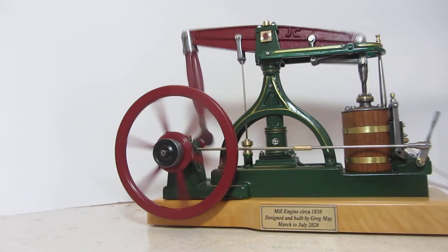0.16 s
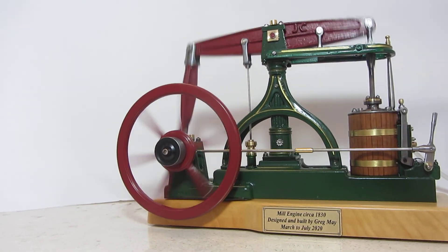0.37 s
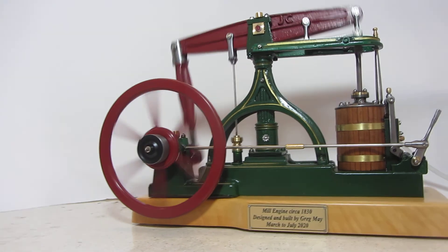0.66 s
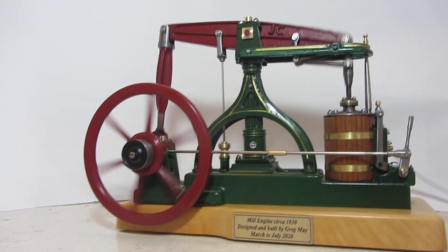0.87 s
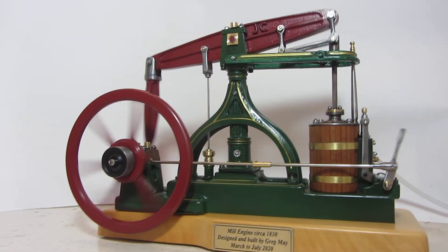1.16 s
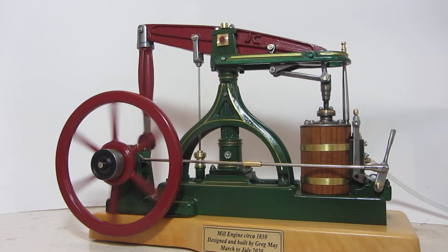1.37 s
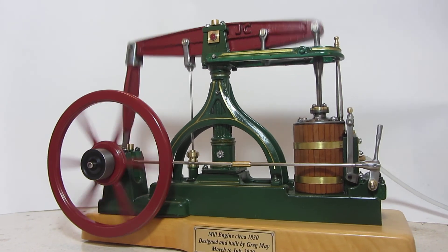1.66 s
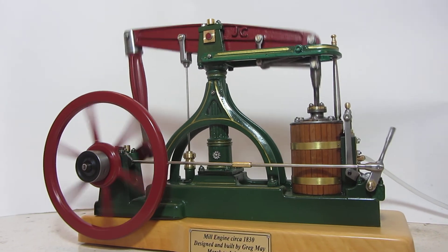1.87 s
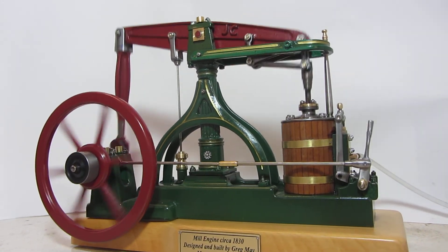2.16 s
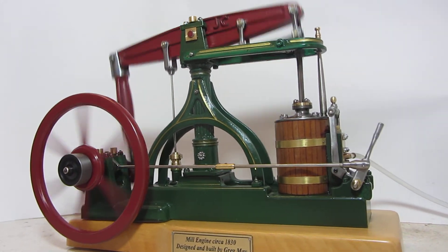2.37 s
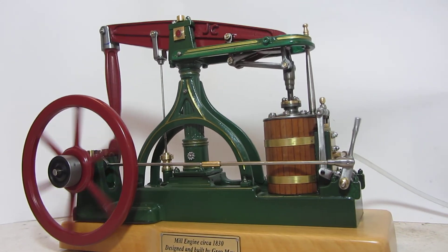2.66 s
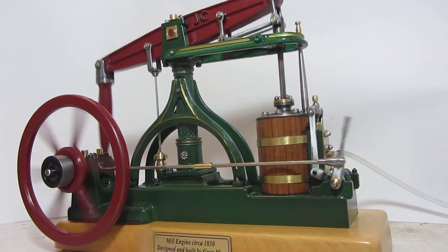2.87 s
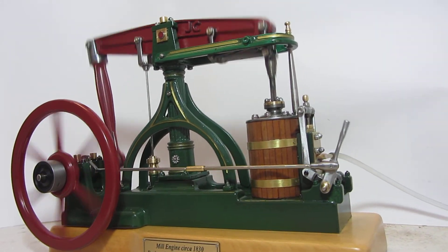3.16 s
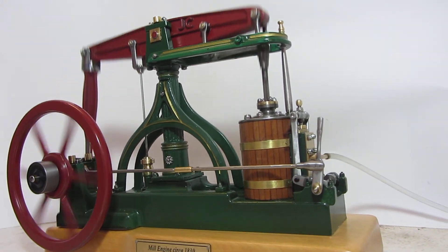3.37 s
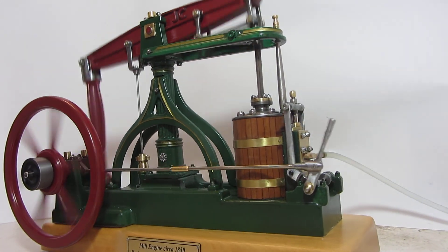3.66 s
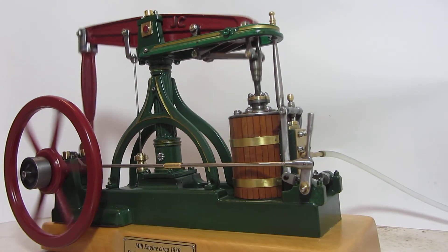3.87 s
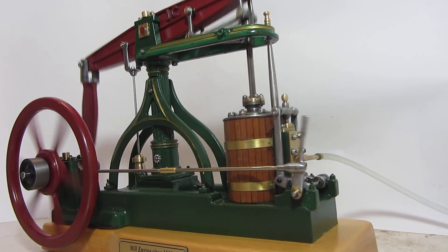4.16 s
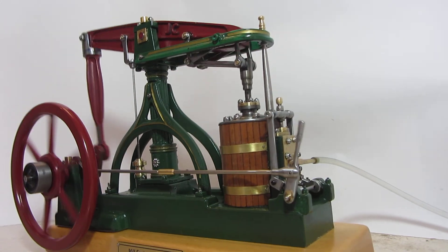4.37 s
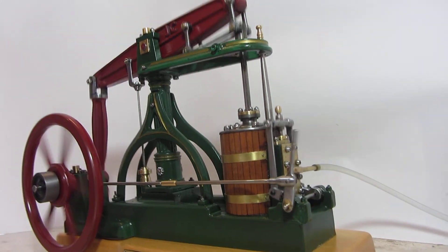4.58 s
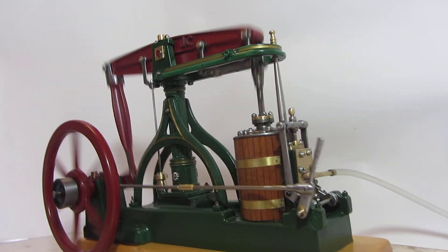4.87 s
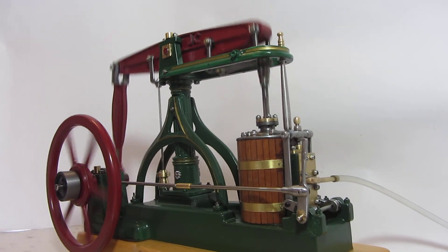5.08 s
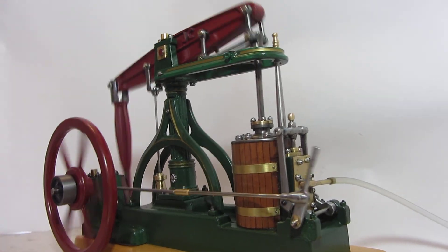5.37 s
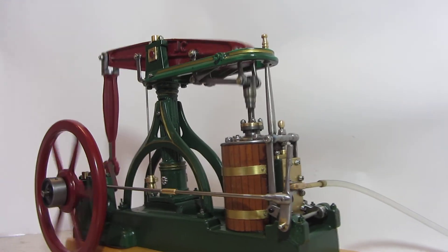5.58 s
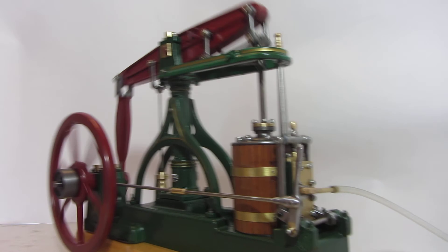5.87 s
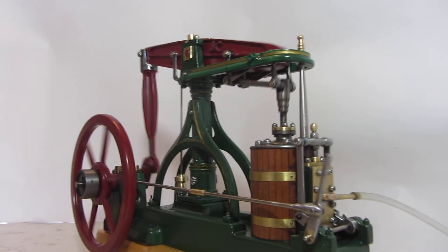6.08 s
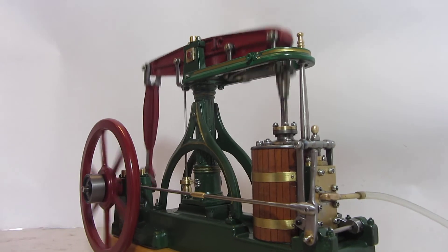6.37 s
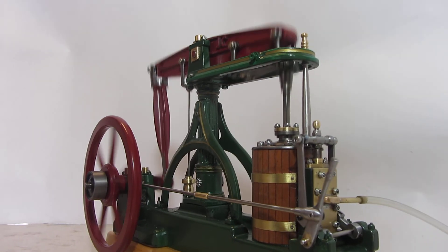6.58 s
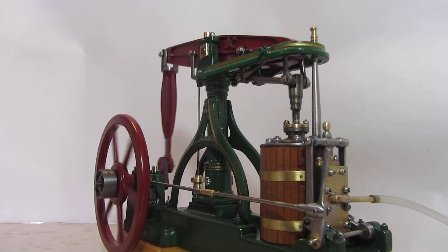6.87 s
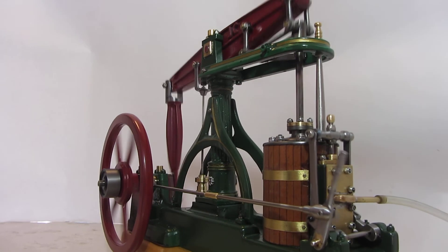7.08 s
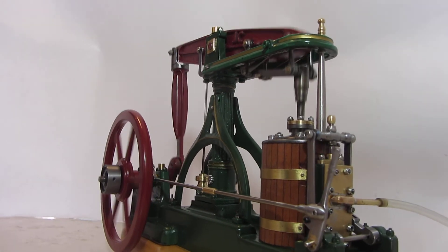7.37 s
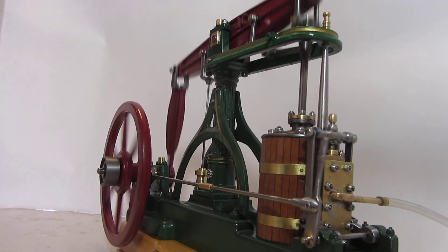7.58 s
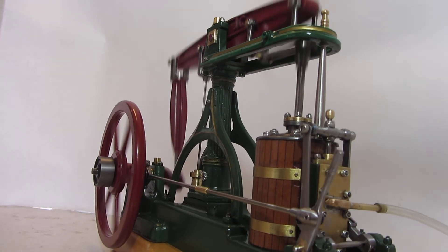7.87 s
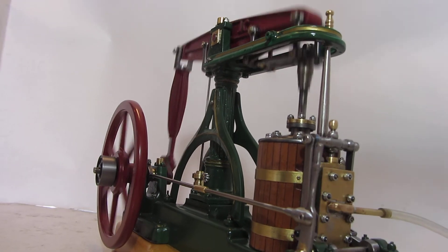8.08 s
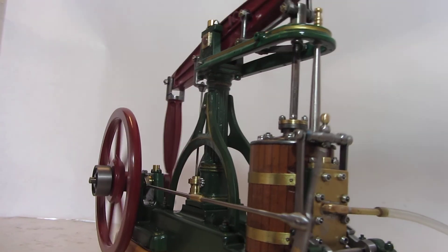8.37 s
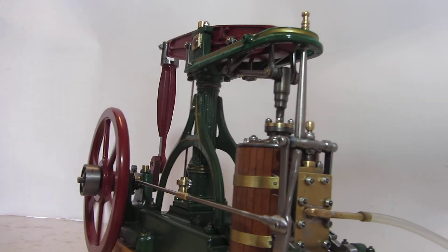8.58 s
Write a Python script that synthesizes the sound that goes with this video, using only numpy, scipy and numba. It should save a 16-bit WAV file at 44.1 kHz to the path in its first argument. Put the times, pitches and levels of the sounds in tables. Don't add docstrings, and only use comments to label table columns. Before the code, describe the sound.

A small tabletop beam engine on compressed air chuffs in fast, even pairs of breathy hisses, with metal joints knocking over a faint room hum.

```python
import sys
import numpy as np
from scipy import signal
from scipy.fft import rfft, irfft
from scipy.io import wavfile
from scipy.ndimage import uniform_filter1d
from numba import njit

SR = 44100
rng = np.random.default_rng(int(sys.argv[2]) if len(sys.argv) > 2 else 0)


def to_wav(sig):
    pcm = np.clip(np.atleast_2d(sig), -1, 1) * 32767
    pcm = np.round(pcm).astype(np.int16)
    wavfile.write(sys.argv[1], SR, pcm.T)


def level_to_linear(level):
    exponent = np.asarray(level, float) / 20
    return 10 ** exponent


N = 385434
T = np.arange(N) / SR
FREQ = np.fft.rfftfreq(N, 1 / SR) + 1e-9

# [crank knock t/s, crank knock level/dB, valve rod tap level/dB, beam link tap level/dB]
TURNS = [(0.155, -20, -46, -20), (0.583, -24, -43, -19), (1.01, -20, -30, -22.5), (1.436, -20, -33, -38),
         (1.862, -19.5, -30, -20.5), (2.288, -20.5, -41, -25), (2.715, -20, -46, -31),
         (3.141, -17.5, -38, -22), (3.566, -13.5, -28, -23), (3.994, -16, -19, -23),
         (4.421, -20.5, -47, -19), (4.845, -19, -23, -23), (5.27, -18, -32, -22.5), (5.694, -17, -36, -21),
         (6.119, -17, -44, -21), (6.546, -13.5, -25, -16), (6.972, -13, -22, -18), (7.398, -13, -21, -19),
         (7.821, -13, -25, -19), (8.243, -14, -37, -22), (8.666, -13, -23, -22)]
# [share of the turn, jet level/dB, pipe level/dB]
UP_STROKE = [
    (0, -20, -9),
    (.03, -3.5, -11),
    (.08, 6.5, -1),
    (.14, 3, 3.5),
    (.3, 2.5, 1.5),
    (.35, 2, -3),
    (.4, -8.5, -6),
    (.46, -12, -26),
    (.52, -38, -40),
]
# [share of the turn, jet level/dB, pipe level/dB]
DOWN_STROKE = [
    (.44, -34, -25),
    (0.482, -0.5, -6),
    (.54, 5.5, 0),
    (.68, 2.5, 1),
    (.78, -2.5, -3.5),
    (.86, -6, -8),
    (.94, -23, -19),
    (.995, -51, -25.5),
]
PIPE_BEND = [(0, 0.41), (.08, 0.88), (.2, 0.99), (.33, 0.966), (.43, 0.69), (.5, 1.24), (.95, 0.7)]
# [f/Hz, level/dB per Hz]
JET_SPECTRUM = [(700, -34.5), (1400, -20), (2080, -6), (2400, -30), (3160, -6), (3600, -8), (4250, 0),
                (5030, -4), (6100, -0.3), (8250, 1), (12200, -15), (14700, -12), (15650, -13.5),
                (16100, -47)]
# [f/Hz, width/Hz, level/dB]
PIPE_MODES = [(2124, 430, 2), (3060, 1160, 0.5), (4480, 1640, 4)]
# [t/s, jet level/dB, pipe level/dB]
PORT = [(0.15, -32, -33.5), (1, -30.5, -32.5), (2.7, -30.5, -32.5), (4.4, -28.5, -30), (5.3, -28.5, -30.5),
        (6.1, -28.5, -30.5), (7.4, -27, -32.5), (8.7, -27, -30.5)]
# from the side, half way, at the valve end [level/dB]
RUSH_DB = (-18, -21.5, -22.5)
# from the side, at the valve end [level/dB]
LEAK_DB = (-42.5, -40.5)
MOUTH_RATIO = (1.18, 1.16, 1.0)
# [t/s, level/dB]
STRAY_TAPS = [
    (0.261, -19),
    (7.008, -21),
]
# [f/Hz, level/dB, t60/s]
FRAME_MODES = [(297, -6.5, 0.044), (432, -1, 0.033), (534, -9, 0.061), (902, -4.5, 0.019),
               (1120, -7, 0.028), (1450, -3, .015)]
# [f/Hz, level/dB, t60/s]
BASE_MODES = [(74, -16, .3), (97, -12, .4), (151.9, 0, .43), (169.5, -6, .7)]
THUMP_DB = (-38.5, -34.5, -30.5, -27.5)
# [t/s, left lag/ms, left minus right level/dB, lift of the top level/dB]
CAMERA_PATH = [(0, 0.073, -8, -5), (1, 0.08, -7, -8), (2.098, 0.072, -9, -3), (2.9, 0.051, -10, -1),
               (3.9, 0.045, -9.5, -0.5), (4.5, 0.035, -7.5, 2), (6.3, 0.041, -6.5, 0),
               (8.74, 0.032, -8, 1.5)]
# [t/s, share of the way]
CAMERA_WAY = [(0.0, 0.0), (1.0, 0.06), (2.1, 0.18), (2.9, 0.26), (3.9, 0.47), (4.5, 0.6), (6.3, 0.86),
              (8.74, 1.0)]
# [delay from the side/ms, delay at the valve end/ms, share from the side, share half way, share at the end]
ECHO_LEFT = [(0.206, 0.233, -0.31, -0.48, -0.02), (0.388, 0.296, 0.0, 0.12, -0.14),
             (0.244, 0.319, -0.12, -0.38, 0.1), (0.318, 0.371, -0.14, 0.01, 0.27),
             (0.501, 0.427, -0.1, -0.33, 0.18), (0.649, 0.61, -0.05, -0.18, -0.34),
             (0.757, 0.662, 0.13, 0.04, 0.11), (0.882, 0.816, 0.19, 0.19, 0.23),
             (1.456, 1.117, 0.04, 0.05, 0.07)]
# [delay from the side/ms, delay at the valve end/ms, share from the side, share half way, share at the end]
ECHO_RIGHT = [(0.245, 0.221, -0.49, -0.23, -0.15), (0.366, 0.346, -0.06, 0.27, 0.27),
              (0.435, 0.413, -0.04, 0.2, 0.27), (0.772, 0.577, 0.24, 0.29, 0.17),
              (0.828, 0.678, -0.03, 0.21, 0.02), (0.886, 0.748, 0.2, 0.29, 0.23),
              (1.201, 0.939, 0.07, 0.04, 0.08), (1.601, 1.149, 0.19, -0.02, -0.09),
              (1.717, 1.384, 0.12, 0.04, 0.09)]
# [f/Hz, level/dB per Hz]
ROOM_SPECTRUM = [(15, -47), (25, -5), (153, 2), (363, -2), (451, -5), (503, -3), (754, -5.5), (2000, -2.5),
                 (3080, 3.5), (3720, 3), (6920, -36), (9070, 28), (12500, 10), (14800, -13), (16000, -27)]
# [t/s, level/dB]
FAN_HUM = [(0, -54.5), (2, -50), (4, -53), (6, -55), (8.74, -53.5)]


def exhaust(top_db, way):
    knock_s = np.transpose(TURNS)[0]
    marks = np.r_[2 * knock_s[0] - knock_s[1], knock_s, 2 * knock_s[-1] - knock_s[-2]]
    phase = np.interp(T, marks, np.arange(len(marks))) % 1
    port_s, *port_levels = np.transpose(PORT)
    jet_db, pipe_db = (np.interp(T, port_s, level) for level in port_levels)
    up_jet, up_pipe = valve(UP_STROKE, phase)
    down_jet, down_pipe = valve(DOWN_STROKE, phase)
    jet_flow = level_to_linear(jet_db) * (up_jet + down_jet * level_to_linear(between((2, 2, 1.5), way)))
    pipe_flow = level_to_linear(pipe_db) * (up_pipe + down_pipe * level_to_linear(between((-4.5, -7, -6), way)))
    hiss = jet(top_db)
    tone = pipe(phase, way)
    rush = level_to_linear(between(RUSH_DB, way)) * noise(peak(1660, 450) ** 2)
    leak = level_to_linear(between(LEAK_DB, way)) * noise(colour(JET_SPECTRUM) * np.sqrt(FREQ / 6000))
    jet_flow = jet_flow * level_to_linear(0.85 * walk(90))
    pipe_flow = pipe_flow * level_to_linear(1.73 * walk(60))
    return jet_flow * (hiss + rush) + pipe_flow * tone + leak


def valve(opening, phase):
    share, *levels = np.transpose(opening)
    return [level_to_linear(np.interp(phase, share, level, -80, -80)) for level in levels]


def jet(top_db):
    low_share = 1 / np.sqrt(1 + (FREQ / 10500) ** 8)
    white = rfft(rng.standard_normal(N)) * colour(JET_SPECTRUM)
    return unit(irfft(white * low_share, N) + level_to_linear(top_db) * irfft(white * (1 - low_share), N))


def pipe(phase, way):
    bend = np.interp(phase, *np.transpose(PIPE_BEND))
    breaths = rng.standard_normal((len(PIPE_MODES), N))
    ratios = (between(MOUTH_RATIO, way), 1, 1)
    tone = 0
    for breath, (hz, width_hz, db), ratio in zip(breaths, PIPE_MODES, ratios):
        tuning = np.tan(np.pi * hz * bend * ratio / SR)
        once = sweep(breath, tuning, width_hz / hz)
        tone = tone + level_to_linear(db) * sweep(once, tuning, width_hz / hz)
    return unit(tone)


@njit
def sweep(x, g, k):
    y, band, low = np.empty(len(x)), 0., 0.
    for i in range(len(x)):
        v = (band + g[i] * (x[i] - low)) / (1 + g[i] * (g[i] + k))
        band, low, y[i] = 2 * v - band, low + 2 * g[i] * v, k * v
    return y


def knocks():
    crank_s, crank_db, rod_db, link_db = np.transpose(TURNS)
    stray_s, stray_db = np.transpose(STRAY_TAPS)
    tap_s = np.r_[crank_s - .063, crank_s + .129, stray_s]
    tap_db = np.r_[rod_db, link_db, stray_db]
    clicks = ring(crank_s, crank_db - 8.5, FRAME_MODES, push_ms=1.1, spread_db=3.0)
    clicks = clicks + ring(tap_s, tap_db - 9, FRAME_MODES, push_ms=1.2, spread_db=3.0)

    def base_db(at_s):
        return between(THUMP_DB, at_s / T[-1])

    opposed = np.array([[1], [1], [-1], [1]])
    thumps = ring(crank_s + .0004, base_db(crank_s), BASE_MODES, push_ms=3.0, spread_db=1.0, sense=opposed)
    thumps = thumps + ring(tap_s, base_db(tap_s) - 15, BASE_MODES, push_ms=3.0, spread_db=3.0)
    drone_db = base_db(T) - 18 + 3.0 * walk(7)
    drone = level_to_linear(drone_db) * noise(sum(level_to_linear(db) * peak(hz, 9) for hz, db, _ in BASE_MODES))
    return -clicks, thumps + drone


def ring(times, db, modes, push_ms, spread_db, sense=1):
    hz, mode_db, t60 = np.transpose(modes)[:, :, None]
    out, t = np.zeros(N + SR), np.arange(int(SR * t60.max())) / SR
    decay = 1000 ** (-t / t60)
    push = 1 - np.exp(-t * 1000 / push_ms)
    rings = sense * level_to_linear(mode_db) * np.sin(2 * np.pi * hz * t) * decay * push
    chances = rng.standard_normal((len(times), len(modes)))
    for s, blow_db, chance in zip(times, db, chances):
        start = int(s * SR)
        out[start:start + len(t)] += level_to_linear(blow_db + spread_db * chance) @ rings
    return out[:N]


def heard(direct, dull, echoes, lag_ms, way):
    echo = 0
    for row in echoes:
        delay_ms = lag_ms + between(row[:2], way)
        echo = echo + between(row[2:], way) * late(dull, delay_ms)
    return late(direct, lag_ms) + 1.35 * echo


def fine(x, gain=1):
    return 2 * irfft(rfft(x) * gain, 2 * N)


def late(x_fine, ms):
    at = np.clip(2 * SR * (T - ms / 1000), 0, 2 * N - 2)
    k = at.astype(int)
    return x_fine[k] + (at - k) * (x_fine[k + 1] - x_fine[k])


def walls(x, t60, wet_db):
    t = np.arange(SR // 6) / SR
    hop = int(0.8 * SR)
    x = np.r_[np.zeros(hop), x, np.zeros(2 * hop)]
    out = np.zeros((2, N + 4 * hop))
    fade = np.sin(np.pi * np.arange(2 * hop) / (2 * hop))
    for start in range(0, N + hop, hop):
        tail = rng.standard_normal((2, len(t))) * 1000 ** (-t / t60) * (t > .0015)
        tail /= np.sqrt(np.sum(tail ** 2, axis=1, keepdims=True))
        part = x[start:start + 2 * hop] * fade
        out[:, start:start + 2 * hop + len(t) - 1] += signal.fftconvolve(part[None], tail, axes=1)
    return level_to_linear(wet_db) * out[:, hop:hop + N]


def room():
    gain = colour(ROOM_SPECTRUM) / np.sqrt(1 + (FREQ / 1500) ** 4)
    flicker_db = 0.9 * walk(6) + 1.6 * walk(25)
    mid, side = noise(gain), 1.04 * noise(gain)
    rumble = level_to_linear(-44.5 + .5 * T + flicker_db)
    hum_db = np.interp(T, *np.transpose(FAN_HUM)) + 0.5 * walk(8.1)
    hum = np.sqrt(2) * level_to_linear(hum_db) * np.sin(2 * np.pi * 449 * T + 0.15 * walk(2.21))
    duct = level_to_linear(between((-54, -56, -62), T / T[-1])) * noise(peak(954, 71) ** 2)
    fan = np.array([[.85], [1.15]]) * (hum + duct)
    return rumble * np.array([0.8 * (mid + side), mid - side]) + fan


def unit(x):
    return x / np.sqrt(np.mean(x ** 2))


def noise(gain):
    real, imaginary = rng.standard_normal((2, len(FREQ)))
    return unit(irfft((real + 1j * imaginary) * gain, N))


def colour(points):
    hz, db = np.transpose(points)
    return level_to_linear(np.interp(np.log(FREQ), np.log(hz), db))


def peak(hz, width_hz):
    return 1 / np.sqrt(1 + ((FREQ - hz ** 2 / FREQ) / width_hz) ** 2)


def walk(rate):
    k = int(SR / rate)
    steps = np.repeat(rng.standard_normal(N // k + 1), k)
    return 1.05 * uniform_filter1d(steps, k)[:N]


def between(ends, way):
    return np.interp(way, np.linspace(0, 1, len(ends)), ends)


def scene():
    path_s, *columns = np.transpose(CAMERA_PATH)
    lag_ms, pan_db, top_db = (np.interp(T, path_s, column) for column in columns)
    way = np.interp(T, *np.transpose(CAMERA_WAY))
    air = exhaust(top_db, way)
    clicks, thumps = knocks()
    direct = fine(air)
    dull = fine(air, 1 / np.sqrt(1 + (FREQ / 11500) ** 4))
    left = heard(direct, dull, ECHO_LEFT, lag_ms, way)
    right = heard(direct, dull, ECHO_RIGHT, 0, way)
    engine = np.array([left * level_to_linear(pan_db / 2), right * level_to_linear(-pan_db / 2)])
    body = np.array([[.75], [1.25]]) * (clicks + thumps)
    treble = signal.sosfilt(signal.butter(2, 8000, "high", fs=SR, output="sos"), air)
    wet = walls(air + 0.96 * treble + .4 * clicks + .5 * thumps, t60=.15, wet_db=-7.5)
    return engine + body + wet + room()


def roll_off(x):
    return signal.sosfilt(signal.butter(12, 15880, fs=SR, output="sos"), x)


def record(dry):
    mix = signal.sosfilt(signal.butter(3, 48, "high", fs=SR, output="sos"), dry)
    mix = signal.sosfilt(signal.ellip(10, .3, 70, 15950, fs=SR, output="sos"), mix)
    return roll_off(mix)


dry = scene()
out = record(dry)
to_wav(out)
```